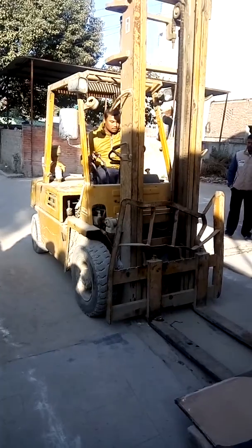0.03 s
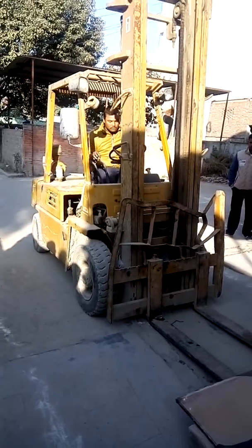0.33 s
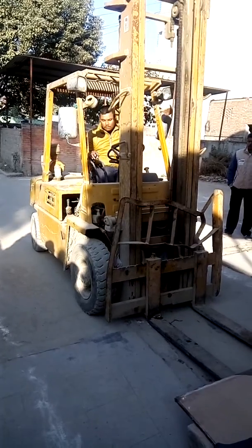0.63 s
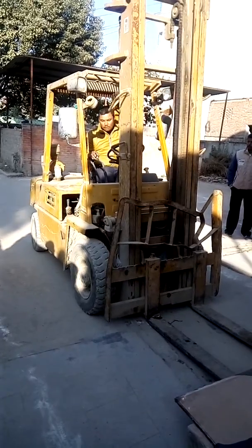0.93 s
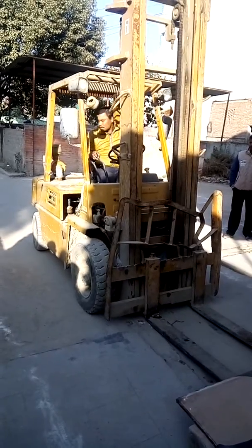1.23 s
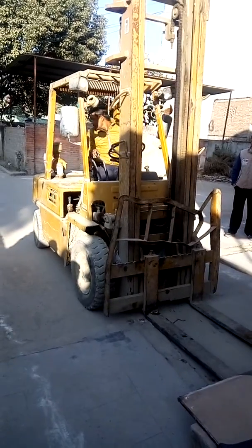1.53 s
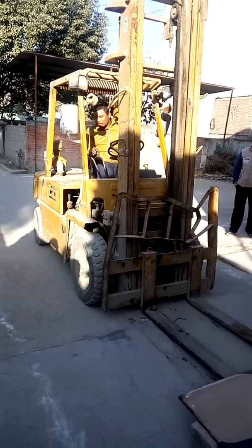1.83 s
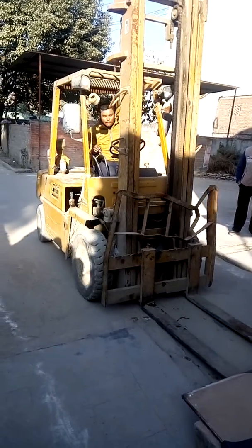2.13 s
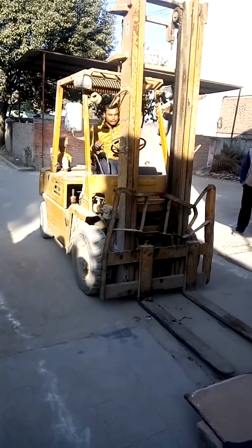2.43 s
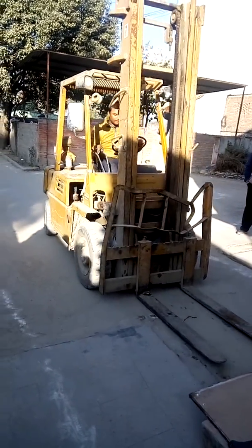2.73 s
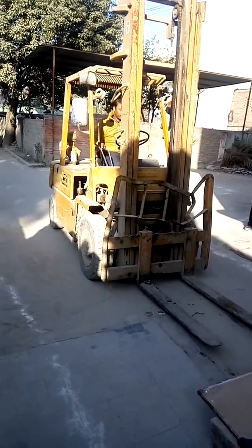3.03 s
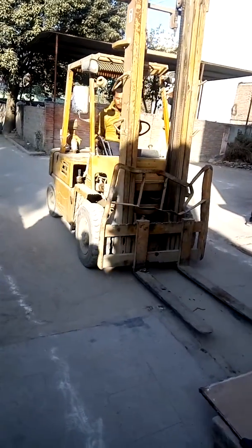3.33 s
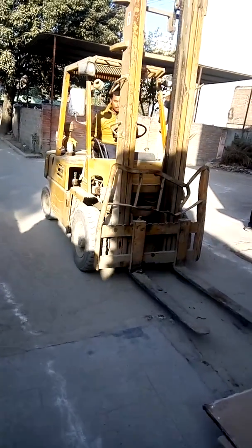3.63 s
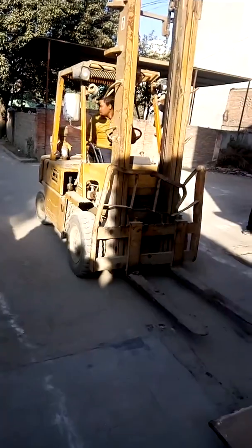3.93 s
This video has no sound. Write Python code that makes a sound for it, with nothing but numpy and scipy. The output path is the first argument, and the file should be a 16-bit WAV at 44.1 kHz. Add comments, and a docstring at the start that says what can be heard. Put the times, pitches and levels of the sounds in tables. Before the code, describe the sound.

A diesel forklift idles with a low, throbbing rumble in an outdoor yard. It revs briefly with a few dull clunks, then swells again and starts rolling, with shuddering panels, light rattles and a faint squeak.

```python
"""Diesel forklift in a yard

An old diesel idles, takes a few dabs of throttle and starts to roll with a squeak. Each firing thumps
out of the exhaust, rings silencer and tailpipe and knocks in the block. Loose panels shudder, the
chassis clunks, fittings buzz and rattle. Walls return a short echo; faint hiss and rumble lie beneath."""
import sys
import numpy as np
from scipy import signal
from scipy.fft import rfft, irfft
from scipy.io import wavfile
from scipy.ndimage import uniform_filter1d

SR = 44100
rng = np.random.default_rng(int(sys.argv[2]) if len(sys.argv) > 2 else 0)


def output_pcm(signal):
    """Save a mono or channel-first signal as 16-bit PCM at the path in sys.argv[1].

    Samples are clipped to [-1, 1] before scaling.
    """
    pcm = np.clip(np.atleast_2d(signal).T, -1, 1) * 32767
    wavfile.write(sys.argv[1], SR, np.round(pcm).astype(np.int16))


N = 176400
t = np.arange(N) / SR


def undb(db):
    """Decibels to gain."""
    return 10 ** (np.asarray(db) / 20)


def unit(x):
    """Scale to rms 1."""
    return x / np.sqrt(np.mean(x ** 2))


def curve(rows):
    """Join (s, value) rows by straight lines."""
    return np.interp(t, *np.array(rows).T)


def walk(rate_hz, spread):
    """Straight ramps between random values of standard deviation `spread`."""
    step = int(SR / rate_hz)
    held = np.repeat(rng.standard_normal(N // step + 1), step)
    return spread * uniform_filter1d(held, step)[:N]


def band(x, low_hz, high_hz):
    """Steep band-pass, rms 1."""
    return unit(signal.sosfilt(signal.butter(4, [low_hz, high_hz], "band", fs=SR, output="sos"), x))


def colour(x, points):
    """Minimum-phase filter through (Hz, dB) points, rms 1."""
    hz, db = np.array(points).T
    size = 16384
    bins_hz = np.maximum(np.fft.rfftfreq(size, 1 / SR), 1)
    gain = undb(np.interp(np.log(bins_hz), np.log(hz), db))
    cepstrum = irfft(np.log(gain))
    cepstrum[1:size // 2] *= 2
    cepstrum[size // 2 + 1:] = 0
    response = irfft(np.exp(rfft(cepstrum)))[:size // 2]
    return unit(signal.fftconvolve(x, response)[:N])


def ring(x, modes):
    """Drive (Hz, width Hz, dB) resonances of alternating sign, rms 1."""
    return unit(sum((-1) ** k * undb(db) * signal.lfilter(*signal.iirpeak(hz, hz / width, SR), x)
                    for k, (hz, width, db) in enumerate(modes)))


def strikes(firings, pattern_db, scatter_db, jitter_s, lag_s=0):
    """One impulse per firing, uneven in strength and timing."""
    onsets = np.flatnonzero(np.diff(np.floor(firings), prepend=-1) > 0)
    timing, strength = rng.standard_normal((200, 2))[:len(onsets)].T
    samples = np.clip(onsets + SR * (lag_s + jitter_s * timing), 0, N - 1).astype(int)
    levels_db = np.resize(pattern_db, len(onsets)) + scatter_db * strength
    return np.bincount(samples, undb(levels_db), N)


def bursts(hits, decay_s):
    """A dying puff of noise after each impulse, with the same energy."""
    envelope = signal.lfilter([1], [1, -np.exp(-1 / (decay_s * SR))], hits)
    return envelope * rng.standard_normal(N) * np.sqrt(2 / (decay_s * SR))


def ping(start_s, hz, t60_s, contact_s=0.002):
    """One softly struck mode, dying away."""
    age = t[:SR // 4]
    tone = np.sin(2 * np.pi * hz * age) * undb(-60 * age / t60_s) * np.tanh(age / contact_s) ** 2
    return np.concatenate([np.zeros(int(start_s * SR)), tone, np.zeros(N)])[:N]


# Each entry: one cylinder's relative strength in dB.
CYLINDER_DB = [1.2, -2, -0.7, -1.5]
# Each row: frequency in Hz, relative gain in dB.
THUMP_SPECTRUM = [(2, -41), (15, -19.5), (36, -16.5), (50, -2), (60, -4), (76, 4.5), (100, -1), (125, -16),
                  (170, -15), (260, -39), (600, -83.5), (4000, -120)]
# Each row: time in seconds, thump level in dB before speed scaling. Follows the throttle.
THUMP_LEVEL = [(0, -41), (.72, -41), (.82, -29.5), (.92, -30.5), (1.0, -41), (1.28, -40), (1.42, -33),
               (1.55, -34), (1.63, -41), (1.8, -38), (1.95, -33), (2.16, -31), (2.42, -39), (2.95, -42),
               (3.2, -42), (3.74, -39), (3.86, -31), (4, -29)]


def exhaust(firings, octaves):
    """Gas pulses thump out of the pipe and set silencer and tailpipe ringing."""
    pulses = strikes(firings, CYLINDER_DB, scatter_db=0.5, jitter_s=0.00072, lag_s=0.0024)
    turbulence = undb(-16) * bursts(pulses, decay_s=0.049)
    thump = colour(pulses + turbulence, THUMP_SPECTRUM) * undb(curve(THUMP_LEVEL))
    speed_gain = 2 ** (-octaves / 2)  # -3 dB per doubling of speed
    return (thump + silencer_boom(firings)) * speed_gain + tailpipe(pulses) + silencer_hum(firings)


# Each entry: one cylinder's relative drive in dB.
BOOM_CYLINDER_DB = [1, -4, 3.7, -1]
# Each row: frequency in Hz, width in Hz, relative gain in dB.
SILENCER_MODES = [(159.45, 10.9, 2.5), (251.1, 8.8, -7)]
# Each row: time in seconds, level in dB before speed scaling.
BOOM_LEVEL = [(0, -34), (.68, -32.5), (.85, -27.5), (1.1, -35), (1.35, -30), (1.8, -33.5), (2.2, -28.5),
              (2.6, -33), (2.92, -31), (3.25, -37.5), (3.6, -37), (4, -31)]


def silencer_boom(firings):
    """Each pulse and its trailing turbulence ring the silencer."""
    pulses = strikes(firings, BOOM_CYLINDER_DB, scatter_db=0.5, jitter_s=0.0009, lag_s=0.0033)
    turbulence = undb(-4.5) * bursts(pulses, decay_s=0.049)
    return band(ring(pulses + turbulence, SILENCER_MODES), 128.4, 291.6) * undb(curve(BOOM_LEVEL))


# Each row: frequency in Hz, width in Hz, relative gain in dB.
PIPE_MODES = [(87.8, 3.8, 6.5), (108.7, 9, -2)]
# Each row: time in seconds, level in dB.
DRONE_LEVEL = [(0, -36.5), (.62, -38), (.74, -46.5), (1.15, -45), (1.5, -38), (1.75, -42.5), (2.27, -33.5),
               (2.45, -38), (2.8, -45), (3.08, -45), (3.35, -34), (4, -37.5)]


def tailpipe(pulses):
    """Exhaust pulses keep the pipe's low resonances droning."""
    return band(ring(pulses, PIPE_MODES), 70, 125) * undb(curve(DRONE_LEVEL))


# Each row: time in seconds, level in dB.
HUM_LEVEL = [(0, -38), (.15, -40), (.55, -38.5), (.76, -37), (.92, -44), (1.1, -42), (1.28, -38),
             (1.6, -38.5), (1.9, -36), (2.08, -42), (2.35, -37.5), (2.62, -45), (2.85, -40), (3.15, -46),
             (4, -46)]


def silencer_hum(firings, centre_hz=241):
    """The silencer's upper resonance sings on, throbbing with each firing."""
    pitch_hz = centre_hz + walk(rate_hz=9, spread=2.21)
    tone = np.sin(2 * np.pi * np.cumsum(pitch_hz) / SR)
    throb = 1 + 0.4 * np.cos(2 * np.pi * firings)
    sway_db = walk(rate_hz=7.4, spread=1.19)
    return unit(tone * throb * undb(sway_db)) * undb(curve(HUM_LEVEL))


# Each entry: one cylinder's relative knock in dB.
KNOCK_DB = [3.4, 0, -4.4, 1]
# Each row: frequency in Hz, width in Hz, relative gain in dB.
BLOCK_MODES = [(552, 130, 5), (546.3, 11, 17.5), (646, 24, -4), (716, 2.7, 4.5), (759.4, 22, 5.5),
               (967, 170, -6.5), (917, 25, 0), (1273, 100, -2.5)]


def block(firings, octaves, reference_db=-58, db_per_octave=15):
    """Diesel knock and valve taps ring the block and shake the parts on it."""
    knocks = strikes(firings, KNOCK_DB, scatter_db=1.8, jitter_s=0.00026)
    valves = strikes(firings + 0.69, CYLINDER_DB, scatter_db=1.8, jitter_s=0.00069)
    taps = unit(bursts(knocks + undb(-0.5) * valves, decay_s=0.0046))
    drive = taps + undb(-3.5) * rng.standard_normal(N)
    clatter = band(ring(drive, BLOCK_MODES), 400, 1500) * undb(reference_db + db_per_octave * octaves)
    return clatter + fittings_buzz(taps) + jingle(taps)


# Each row: frequency in Hz, relative gain in dB.
CHURN_SPECTRUM = [(20, -4.5), (60, -6), (130, 1), (200, 0.5), (270, -2), (320, -3.5), (400, -7.5),
                  (600, -17.5), (800, -18.5), (1100, -26), (1600, -34), (2100, -41.5), (2700, -49.5),
                  (4000, -59), (8000, -72.5)]


def churn(firings, octaves, reference_db=-38, db_per_octave=7.5):
    """Gear and fan noise, pulsing slightly with each firing."""
    pulse_db = 0.94 * np.cos(2 * np.pi * (firings - 0.06))
    noise = rng.standard_normal(N) * undb(pulse_db)
    return colour(noise, CHURN_SPECTRUM) * undb(reference_db + db_per_octave * octaves)


# Each row: frequency in Hz, relative gain in dB.
PANEL_SPECTRUM = [(100, -36), (250, -7.5), (380, 1.5), (500, 1), (680, -2), (950, -8), (1300, -14.5),
                  (1700, -23), (2200, -23), (2800, -43.5), (3800, -60.5), (8000, -87)]
# Each row: frequency in Hz, width in Hz, relative gain in dB.
PANEL_MODES = [(375, 38, 4), (438.4, 19, 2.5), (485, 24, -1), (607, 32, 4.5), (785, 20, -1.5),
               (980, 19, -5)]
# Each row: time in seconds, level in dB.
SHUDDER_LEVEL = [(0, -50), (.68, -55.5), (.85, -44.5), (.99, -49), (1.04, -42.5), (1.11, -42.5),
                 (1.185, -41.5), (1.3, -48.5), (1.7, -51), (2.0, -49.5), (2.2, -46.5), (2.3, -38),
                 (2.42, -43.5), (2.62, -49), (2.68, -40.5), (2.77, -35), (2.87, -38.5), (2.95, -46),
                 (3.2, -62), (3.7, -55), (4, -48)]


def panels():
    """Loose steel covers shudder in a dense, ringing roar."""
    chatter = rng.standard_normal(N)
    ringing = undb(-0.5) * band(ring(chatter, PANEL_MODES), 150, 730)
    return unit(colour(chatter, PANEL_SPECTRUM) + ringing) * undb(curve(SHUDDER_LEVEL))


# Each row: start in seconds, peak in dB.
CLUNKS = [(.822, -32), (1.013, -26.5), (1.034, -28.5), (1.066, -32), (1.157, -30), (1.179, -28),
          (1.201, -32), (1.236, -36), (2.275, -30), (2.315, -29), (2.635, -31), (2.676, -28),
          (2.747, -27.5), (3.3, -40), (3.801, -35)]
# Each row: frequency in Hz, relative gain in dB.
CLUNK_SPECTRUM = [(100, -19.5), (300, 7), (450, 10), (950, -3.5), (1400, -10.5), (2000, -20), (2800, -30.5),
                  (4000, -50.5), (8000, -78)]


def clunks():
    """Slack in mast and chassis knocks home as the drive takes up: short, dull blows."""
    out = np.zeros(N)
    for start_s, peak_db in CLUNKS:
        impact = signal.unit_impulse(N, int(start_s * SR))
        blow = colour(bursts(impact, decay_s=0.013), CLUNK_SPECTRUM)
        out += undb(peak_db) * blow / np.abs(blow).max()
    return out


# Each row: start in seconds, end in seconds, centre in Hz, width in Hz, level in dB.
SQUEAKS = [(2.36, 2.58, 900, 200, -47), (3.39, 3.62, 1865, 170, -64)]


def squeaks():
    """Rubbing as the truck rolls: swells of narrow-band noise."""
    out = np.zeros(N)
    for start_s, end_s, hz, width_hz, db in SQUEAKS:
        progress = np.clip((t - start_s) / (end_s - start_s), 0, 1)
        swell = np.sqrt(np.abs(np.sin(np.pi * progress)))
        out += undb(db) * swell * band(rng.standard_normal(N), hz - width_hz / 2, hz + width_hz / 2)
    return out


# Each row: start in seconds, level in dB, extra gain of the lowest mode in dB.
CLINKS = [(.372, -56, -5), (.732, -50.5, 9), (.771, -58, 14), (.816, -52, 2)]
# Each row: frequency in Hz, T60 in seconds, relative gain in dB.
LINK_MODES = [(985, .11, 0), (2290, .06, -5), (2385, .07, -2), (3106, .1, -20)]


def clinks():
    """A loose link strikes and rings."""
    out = np.zeros(N)
    for start_s, db, low_db in CLINKS:
        for k, (hz, t60_s, mode_db) in enumerate(LINK_MODES):
            out += undb(db + mode_db + low_db * (k == 0)) * ping(start_s, hz, t60_s)
    return out


# Each row: start in seconds, level in dB before bounce losses, frequency in Hz.
RATTLES = [(.139, -60, 2450), (.23, -58, 2100), (.31, -59, 2040), (.993, -54, 2040), (1.59, -58, 2150),
           (1.665, -54, 2050), (1.705, -53, 2330), (1.79, -56, 1950), (1.83, -54, 1760), (1.85, -55, 2400),
           (1.87, -54, 1800), (1.985, -53, 2090), (2.0, -56, 2380), (2.049, -55, 2410), (2.14, -54, 2360),
           (2.16, -52, 2090), (2.44, -54, 2120), (2.989, -51, 1820), (3.068, -58, 2150), (3.2, -57, 2160),
           (3.227, -57, 1960), (3.344, -59, 2250), (3.93, -54, 2130)]


def rattles(bounce_s=0.011, loss_db=1.5):
    """Loose fittings bounce three times, each ping weaker and slightly detuned."""
    out = np.zeros(N)
    for start_s, db, hz in RATTLES:
        for k, (late, detune) in enumerate(rng.uniform(-1, 1, size=(3, 2))):
            hit_s = start_s + k * bounce_s * (1 + 0.3 * late)
            out += undb(db - (k + 1) * loss_db) * ping(hit_s, hz * (1 + 0.025 * detune), t60_s=0.06)
    return out


# Each row: frequency in Hz, width in Hz, relative level in dB.
FITTING_MODES = [(1860, 160, -2), (2040, 50, 4), (2380, 70, -3), (2530, 70, -7), (3600, 200, -15)]
# Each row: time in seconds, level in dB.
BUZZ_LEVEL = [(0, -71), (.55, -74), (.8, -70), (1.4, -70), (1.85, -69), (2.15, -69), (2.7, -70), (3.1, -76),
              (4, -74)]


def fittings_buzz(taps):
    """Thin steel parts buzz with the knock, each coming and going."""
    drive = taps + undb(-13) * rng.standard_normal(N)
    parts = sum(undb(db + walk(rate_hz=24, spread=4.43)) * ring(drive, [(hz, width_hz, 0)])
                for hz, width_hz, db in FITTING_MODES)
    return band(parts, 1600, 3700) * undb(curve(BUZZ_LEVEL))


# Each row: frequency in Hz, width in Hz, relative gain in dB.
JINGLE_MODES = [(3065, 35, 0), (3130, 45, -3), (3600, 110, -11)]
# Each row: time in seconds, level in dB.
JINGLE_LEVEL = [(0, -82), (.2, -79), (.3, -85), (.62, -85), (.78, -77), (.9, -83), (1.02, -76), (1.15, -81),
                (1.55, -78), (1.85, -81), (2.05, -78.5), (2.4, -80), (2.9, -87), (3.3, -94), (4, -90)]


def jingle(taps):
    """A small loose metal part rings unevenly with the engine's shaking."""
    shake = taps + rng.standard_normal(N) / 2
    flicker_db = walk(rate_hz=24, spread=3.74)
    return band(ring(shake * undb(flicker_db), JINGLE_MODES), 2850, 3800) * undb(curve(JINGLE_LEVEL))


def yard(x, t60_s=0.77, gap_s=0.018, echo_db=-11):
    """Walls and a shed roof add a short, thin echo."""
    tail = rng.standard_normal(N) * undb(-60 * t / t60_s) * (t > gap_s)
    thinned = signal.sosfilt(signal.butter(2, 280, "high", fs=SR, output="sos"), x)
    return x + undb(echo_db) * signal.fftconvolve(thinned, tail / np.linalg.norm(tail))[:N]


# Each row: frequency in Hz, relative gain in dB.
HISS_SPECTRUM = [(100, -5.5), (3000, -7), (4500, -7.5), (6200, -10.5), (8000, -19.5), (13800, -24),
                 (15000, -8), (15700, -12.5), (17000, -37)]


def background(hiss_db=-77.5, rumble_db=-68):
    """Faint hiss and a low rumble of air."""
    hiss = undb(hiss_db) * colour(rng.standard_normal(N), HISS_SPECTRUM)
    rumble = undb(rumble_db) * band(rng.standard_normal(N), 6.3, 72)
    return hiss + rumble


# Each row: time in seconds, firing rate in Hz.
FIRING_RATE = [(0.0, 21.21), (0.7, 21.58), (0.78, 24.57), (0.87, 29.05), (1.0, 29.45), (1.25, 23.39),
               (1.5, 25.77), (1.75, 23.67), (1.97, 24.47), (2.12, 27.33), (2.33, 28.32), (2.55, 28.18),
               (2.8, 26.46), (3.1, 23.8), (3.4, 20.7), (3.72, 21.74), (3.9, 24.76), (4.0, 25.69)]
REFERENCE_HZ = 23.2


def scene():
    """One crankshaft times exhaust, block and churn; the body's noises join them in the yard."""
    firing_hz = curve(FIRING_RATE)
    firings = np.cumsum(firing_hz) / SR  # running count
    octaves = np.log2(firing_hz / REFERENCE_HZ)  # engine speed relative to the reference firing rate
    engine = exhaust(firings, octaves) + block(firings, octaves) + churn(firings, octaves)
    body = panels() + clunks() + squeaks() + clinks() + rattles()
    return (yard(engine + body) + background())[None]


def record(dry, top_hz=15700):
    """Steep low-pass on the top treble."""
    return signal.sosfilt(signal.ellip(10, 0.1, 80, top_hz, fs=SR, output="sos"), dry)


dry = scene()
out = record(dry)
output_pcm(out)
```